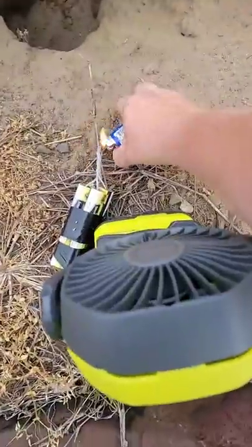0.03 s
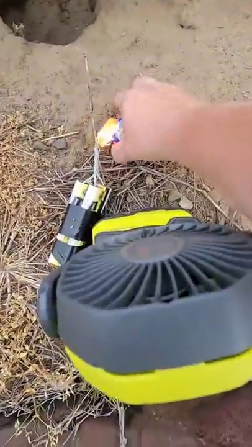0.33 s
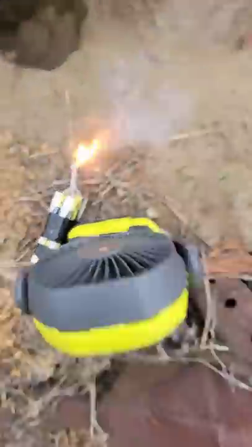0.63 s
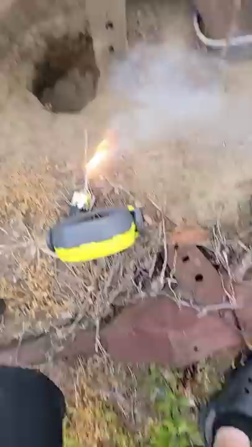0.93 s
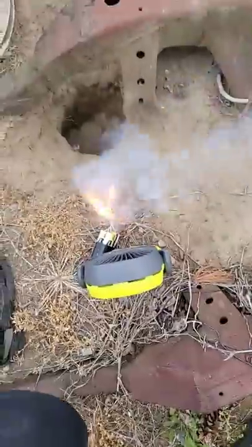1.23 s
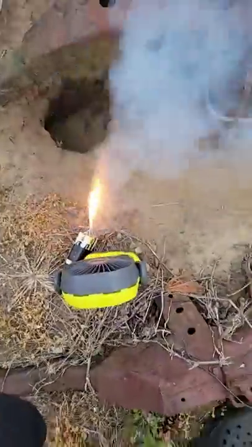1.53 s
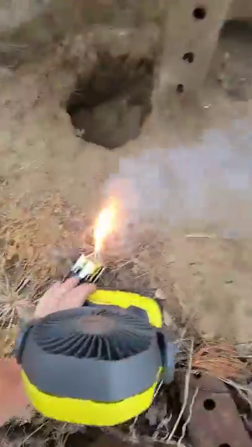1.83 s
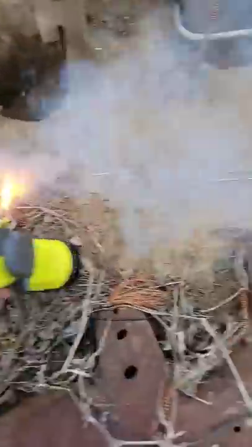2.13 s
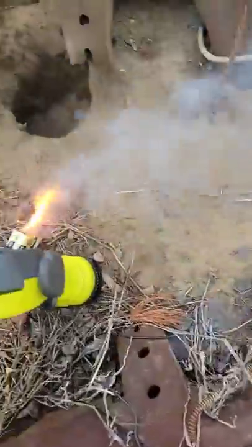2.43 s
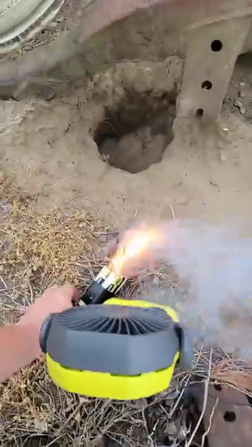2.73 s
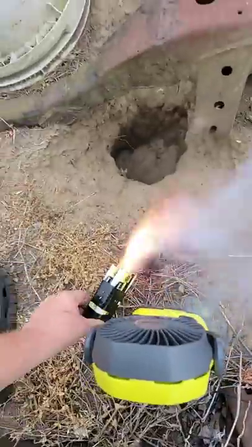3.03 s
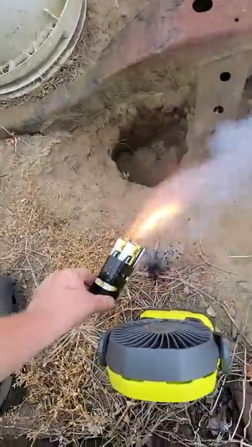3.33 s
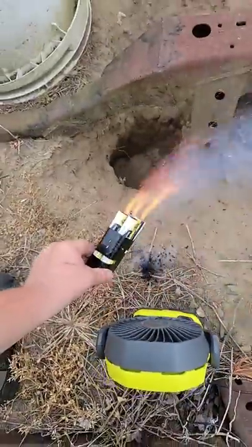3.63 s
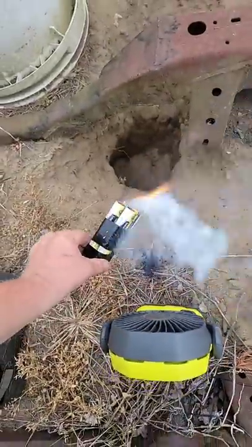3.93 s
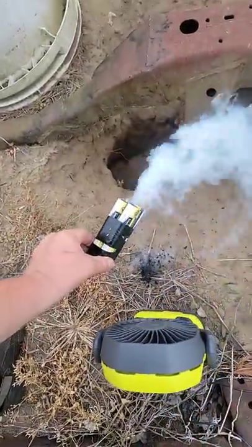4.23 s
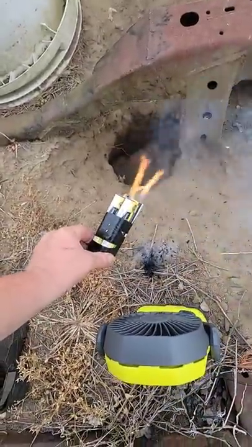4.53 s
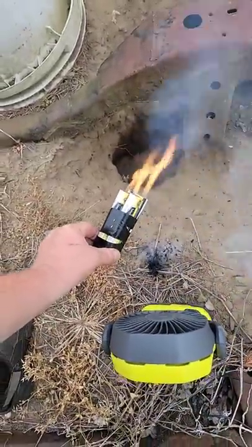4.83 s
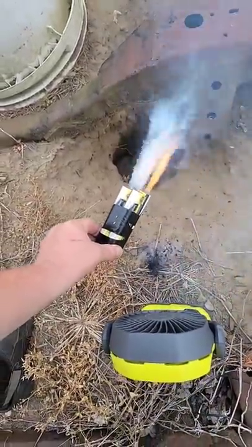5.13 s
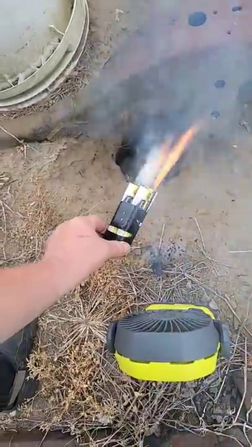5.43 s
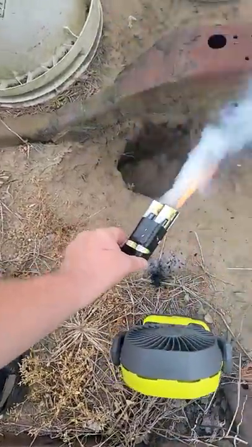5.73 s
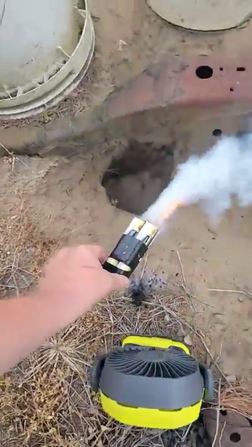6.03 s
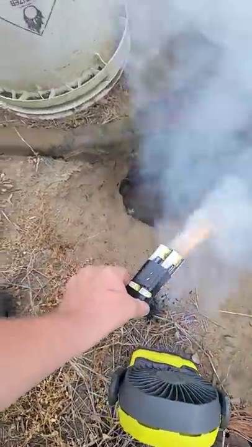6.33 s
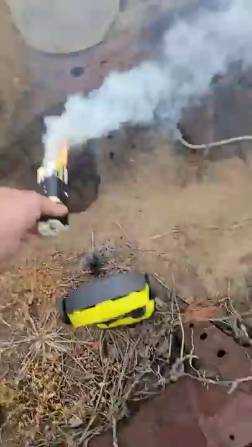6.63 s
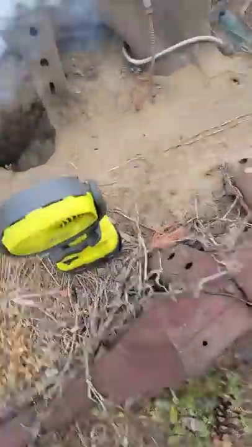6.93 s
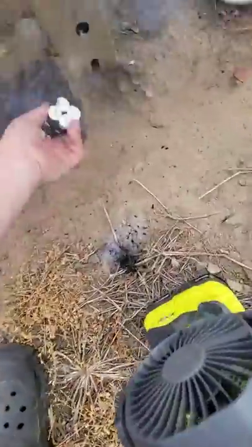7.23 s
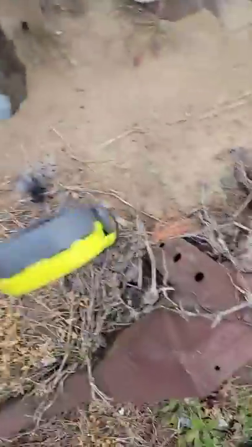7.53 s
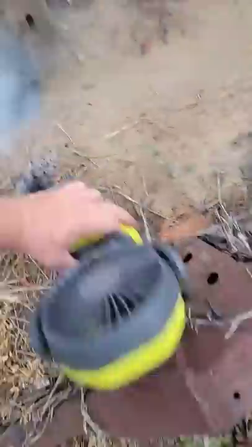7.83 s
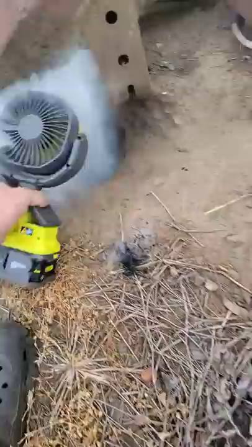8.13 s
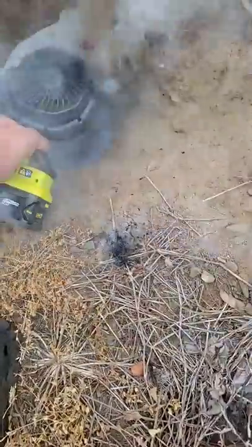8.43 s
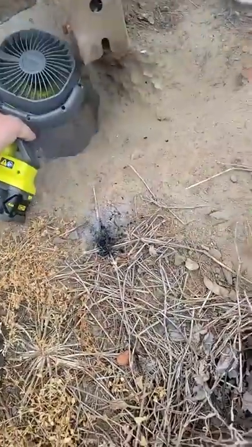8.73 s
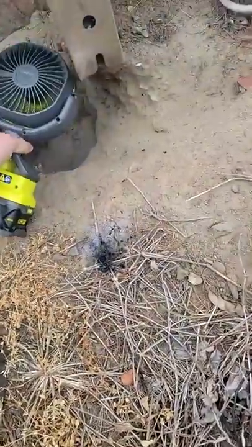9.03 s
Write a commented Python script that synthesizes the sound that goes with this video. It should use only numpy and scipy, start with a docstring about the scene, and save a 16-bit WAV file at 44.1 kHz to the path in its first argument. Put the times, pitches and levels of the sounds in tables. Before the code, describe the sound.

Outdoors, over a low rumble of air, fuses catch with a sharp crack and sizzle close to the microphone. A bundle of smoke tubes takes over with a roaring jet, falters briefly, then hisses and whistles on. Pushed into a burrow, the tubes fall to a quieter, spitting smoulder. They relight with a whump and the flame rumbles in the hole over a low, hollow note.

```python
"""A bundle of smoke tubes burns on bare ground outdoors, over a low rumble of air. The fuses catch
with a crack (0.55 s) and sizzle; the tubes take over (3.4 s) with a roaring gas jet, lose their flame
briefly (4 s), then hiss and whistle on. Pushed into a burrow (7.4 s), they smoulder and spit over its
low note, relight with a whump (8.4 s) and rumble in the hole. All burning is turbulent noise in four
registers (flutter, roar, hiss, sizzle) whose levels follow the gas flow."""
import sys
import numpy as np
from scipy import signal
from scipy.fft import rfft, irfft
from scipy.io import wavfile
from scipy.ndimage import map_coordinates

SR = 44100
rng = np.random.default_rng(int(sys.argv[2]) if len(sys.argv) > 2 else 0)


def output_pcm(signal):
    """Save a mono or channel-first signal as 16-bit PCM at the path in sys.argv[1].

    Samples are clipped to [-1, 1] before scaling.
    """
    pcm = np.clip(np.atleast_2d(signal).T, -1, 1) * 32767
    wavfile.write(sys.argv[1], SR, np.round(pcm).astype(np.int16))


N = 400869
LIGHT_S, BURY_S, RELIGHT_S = 0.49, 7.41, 8.447
SIZE, HOP = 1024, 256
T = np.arange(N) / SR
HZ = np.maximum(np.fft.rfftfreq(SIZE, 1 / SR), 1)[:, None]
FRAME_S = np.arange(-(-N // HOP) + 1) * HOP / SR

# power common to both channels: f/Hz, share for the open jet, share for burrow and air
COHERENCE = [(25, 0.87, 0.88), (60, 0.97, 0.92), (210, 0.99, 0.98), (910, 0.73, 0.73), (2480, 0.39, 0.37),
             (6600, 0.58, 0.053), (14000, 0.093, .1)]
# direction of the tubes: t/s, treble left minus right/dB, left lag/ms
BEARING = [(.5, 5.5, -0.2), (.9, 6, -0.11), (1.2, 2.5, -0.093), (1.7, -0.5, 0.048), (2.3, -2, -0.073),
           (3.15, -2, 0.018), (4.15, -3, -0.081), (5.4, -1, -.1), (6.4, -3.5, 0.011), (6.9, -1.5, -.16),
           (7.4, -1, -0.17), (7.97, -5.5, 0.1), (8.25, 0, -0.17)]


def undb(db):
    """Decibels to gain."""
    return 10 ** (np.asarray(db) / 20)


def follow(rows):
    """Columns of a time curve at every frame."""
    times_s, *columns = np.transpose(rows)
    return [np.interp(FRAME_S, times_s, c) for c in columns]


def across(rows):
    """Columns of a spectrum at every bin."""
    hz, *columns = np.transpose(rows)
    return [np.interp(np.log(HZ), np.log(hz), c) for c in columns]


def split(x):
    """Sound to short-time spectra."""
    return signal.stft(x, nperseg=SIZE, noverlap=SIZE - HOP)[2]


def join(spectra):
    """Short-time spectra to sound."""
    return signal.istft(spectra, nperseg=SIZE, noverlap=SIZE - HOP)[1][..., :N]


def delay(ms):
    """Phase turn of a delay."""
    return np.exp(-2j * np.pi * HZ * ms / 1000)


def gate(start_s, stop_s=np.inf):
    """Gate with 3.2 ms edges, per sample."""
    return np.clip(np.minimum(T - start_s, stop_s - T) / 0.0032, 0, 1)


def ramp(start_s, length_s):
    """Rise from 0 to 1, per frame."""
    return np.clip((FRAME_S - start_s) / length_s, 0, 1)


def swell(at_s, half_s):
    """Bell over time, height 1."""
    return np.exp(-((FRAME_S - at_s) / half_s) ** 2)


def peak(hz, width_hz):
    """Bell over frequency, height 1."""
    return np.exp(-((HZ - hz) / width_hz) ** 2)


def walk(rate_hz, times_s):
    """Random wander with rate_hz turns a second; spread near 1."""
    steps = rng.standard_normal(2 ** 14)
    return np.sqrt(3 / 2) * np.interp(times_s * rate_hz, np.arange(len(steps)), steps)


def patches(width_hz, rate_hz):
    """Random patches in time and frequency; spread near 1."""
    where = np.array(np.broadcast_arrays(HZ / width_hz, FRAME_S * rate_hz))
    return 3 / 2 * map_coordinates(rng.standard_normal((512, 512)), where, order=1, mode="wrap")


def band_db(colour_db, low_hz, high_hz):
    """Level in one band of white noise given this colour."""
    inside = (HZ[:, 0] >= low_hz) & (HZ[:, 0] < high_hz)
    return 10 * np.log10(np.sum(undb(colour_db[inside]) ** 2, axis=0) / len(HZ))


def resonance(rows, width_hz):
    """Moving peak or dip, in dB."""
    hz, db = follow(rows)
    return db * peak(hz, width_hz)


def passing_rings(rows):
    """Resonances that swell and fade, in dB."""
    return sum(db * swell(at_s, half_s) * peak(hz, width_hz) for at_s, half_s, hz, width_hz, db in rows)


def turbulence(coherence, rough_db, rough_hz):
    """Spectra of gusty white noise; the common part reaches one channel later."""
    gusts = undb(rough_db * walk(rough_hz, T))
    noise = split(rng.standard_normal((3, N)) * gusts / np.sqrt(np.mean(gusts ** 2)))
    lag = delay(follow(BEARING)[1] / 2)
    common = noise[0] * np.array([lag, lag.conj()])
    return np.sqrt(coherence) * common + np.sqrt(1 - coherence) * noise[1:]


def air():
    """Low outdoor rumble with a thin hiss on top; recedes as the fuses catch."""
    # air spectrum: f/Hz, relative level/dB
    colour = [(15, -37), (25, 2), (96, 5), (148, 5.5), (421, -13.5), (469, -13.5), (1020, -33),
              (2230, -29.5), (3260, -35), (3720, -32), (6380, -38), (7700, -37), (11500, -42), (15500, -18)]
    noise = turbulence(across(COHERENCE)[1], rough_db=0.5, rough_hz=16)
    rumble = join(noise * undb(across(colour)[0]))
    return rumble / rumble.std() * undb(np.interp(T, [0.5, 0.9], [-49, -54]))


def squeak(at_s=0.345, hz=3230, glide_hz_per_s=12000, half_s=0.014, peak_db=-58):
    """One faint, rough, rising squeak as the fuses are lit."""
    t = T - at_s
    pitch_hz = hz + glide_hz_per_s * np.clip(t, -0.05, 0.05) + 200 * walk(1300, T)
    return undb(peak_db) * np.exp(-(t / half_s) ** 2) * np.sin(2 * np.pi * np.cumsum(pitch_hz) / SR)


def puffs():
    """Low pushes of gas and air that die within a few cycles; some graze one side only."""
    # puffs: t/s, peak/dB, f/Hz, decay/s, left minus right/dB
    pushes = [(0.5535, -27.5, 231, 0.0041, 1), (2.714, -26, 70, .01, 12), (2.792, -26, 123.7, 0.033, 23),
              (2.813, -18.5, 62.6, 0.0041, 28), (2.817, -22.5, 189, 0.0082, 23),
              (2.98, -23.5, 110, 0.023, 28), (3.355, -31, 100, 0.017, -8), (3.694, -22, 113, 0.0058, 8),
              (3.785, -27, 90, 0.0061, 6), (4.313, -29.5, 89, 0.0053, 1), (8.447, -14, 69.6, 0.0093, 1),
              (8.452, -12.5, 185, 0.0054, 1), (8.466, -15, 190, .004, 0), (8.489, -14, 160, 0.0049, 1),
              (8.561, -14, 151, .005, 1), (8.844, -16, 204, 0.0069, 0), (8.894, -19, 220, 0.0049, -1)]
    t = np.arange(SR // 4) / SR
    out = np.zeros((2, N + len(t)))
    for at_s, db, hz, decay_s, pan_db in pushes:
        push = np.sin(2 * np.pi * hz * t) * np.exp(-t / decay_s) * (1 - np.exp(-t / 0.00065))
        pan = undb([[pan_db], [0]])
        start = int(at_s * SR)
        out[:, start:start + len(t)] += undb(db) * pan / pan.mean() * push / abs(push).max()
    return out[:, :N]


def ticks_and_pops(size=4096, rise_share=0.17):
    """Short ticks, cracks, snaps and relighting pops; longer ones open more slowly."""
    # snaps: t/s, level before envelope/dB, decay/s, f/Hz, width/octaves, left minus right/dB
    snaps = [(.144, -54, .003, 12000, 1.2, 5), (.201, -44, 0.0014, 12000, 1.2, 4),
             (.32, -47, .002, 11000, 2.3, 5), (.455, -44, 0.0023, 13000, 1.1, 10),
             (.474, -42, 0.0039, 14000, 1.9, 1), (.491, -40, 0.0076, 13000, 2.5, 5),
             (.515, -38, .002, 12000, 1.7, 3), (.526, -32, .002, 13000, 1.7, 4),
             (.5355, -32, .004, 15000, 0.68, 2), (0.5517, -12, 0.0012, 12500, 1.33, 2),
             (.5525, -30.5, 0.0046, 418, 0.91, -1), (0.835, -26, 0.0009, 1800, 0.73, -16),
             (1.585, -31, .003, 870, .6, -5), (1.621, -31, 0.0034, 850, 0.65, -4),
             (1.752, -29.5, 0.0025, 1040, 0.55, -2), (2.238, -21, 0.0018, 2530, 0.63, -8),
             (4.311, -47, 0.012, 1850, 0.8, -2), (6.634, -27, 0.023, 13300, .2, -14),
             (6.6434, -7.5, 0.00039, 12900, 0.28, -12), (7.407, -22, 0.0013, 3000, 0.62, -2),
             (7.783, -37, 0.012, 13000, 0.25, -13), (7.877, -33, .003, 10000, .6, -3),
             (7.926, -33, .003, 9000, .8, -3), (7.937, -28.5, 0.011, 13000, 0.29, -12),
             (8.186, -32, .007, 13500, 0.38, -9), (8.316, -31, .0015, 13000, .4, -2),
             (8.378, -31, 0.0017, 10900, 0.27, -6), (8.454, -23, 0.0032, 800, 0.94, 0),
             (8.552, -34, .003, 1500, .8, 0), (8.561, -24, 0.0033, 690, 1.3, 4),
             (8.568, -29.5, .002, 1600, 1.1, 0)]
    t = np.arange(size) / SR
    bins_hz = np.maximum(np.fft.rfftfreq(size, 1 / SR), 1)
    out = np.zeros((2, N + size))
    for at_s, db, decay_s, hz, octaves, pan_db in snaps:
        noise = rng.standard_normal((3, size))
        band = np.exp(-0.5 * (np.log2(bins_hz / hz) / octaves) ** 2)
        snap = irfft(rfft(noise[0] + noise[1:]) * band)
        envelope = np.exp(-t / decay_s) * (1 - np.exp(-t / (rise_share * decay_s)))
        pan = undb([[pan_db / 2], [-pan_db / 2]])
        start = int(at_s * SR)
        out[:, start:start + size] += undb(db) * pan * snap / snap.std() * envelope
    return out[:, :N]


def burrow_drone(waver_rate_hz=130, stray_hz=31.93, wobble_db=1.5):
    """Air in the burrow resonates: one low, quickly wavering note, lifted by the flame."""
    # burrow note: t/s, f/Hz, level/dB
    note = [(7.75, 182, -65), (7.92, 184, -42), (8.44, 188, -40.5), (8.47, 195, -33), (9.08, 200.3, -32)]
    times_s, hz, db = np.transpose(note)
    pitch_hz = np.interp(T, times_s, hz) + stray_hz * walk(waver_rate_hz, T)
    level_db = np.interp(T, times_s, db) + wobble_db * walk(waver_rate_hz, T)
    return np.sqrt(2) * np.sin(2 * np.pi * np.cumsum(pitch_hz) / SR) * undb(level_db) * gate(times_s[0])


def crackle(rate_hz, scatter_db):
    """Spectra of tiny sparks of uneven size."""
    sparks = rng.random(N) < rate_hz / SR
    sizes = undb(np.minimum(scatter_db * rng.exponential(size=N), 10))
    clicks = sparks * sizes * rng.uniform(-1.36, 1, (2, N))
    return split(clicks / clicks.std())


def register_levels(law, flow_db=0):
    """Flutter, roar, hiss and sizzle in dB follow the gas flow and its flares; gusts add flutter."""
    # flares: t/s, half length/s, extra flow/dB, extra roar/dB
    flares = [(0.692, 0.068, 2, 3), (3.817, 0.043, 2, 2), (4.376, 0.021, 0.5, 1), (4.654, 0.053, 2.5, 1.5),
              (5.04, 0.084, 2.5, 8.5), (5.105, 0.14, 7.5, -5.5), (5.659, 0.096, 14, -8.5),
              (5.897, 0.091, 1, 2.5), (8.553, 0.017, 5, -4), (8.8, .04, 3, -2), (8.942, 0.11, 6, -2.5)]
    # gusts tearing at the flame: t/s, half length/s, extra flutter/dB
    gusts = [(1.42, 0.15, 4), (2.587, 0.56, 5), (3.157, 0.11, 7), (3.833, 0.14, 3.5), (4.848, 0.066, 5.5),
             (5.108, 0.028, 7.5), (5.695, 0.069, 6.5), (8.494, 0.033, 3), (8.56, 0.013, -1)]
    flow_db = flow_db + sum(db * swell(at_s, half_s) for at_s, half_s, db, _ in flares)
    flutter, roar, hiss, sizzle = (db + slope * flow_db for db, slope in law)
    flutter += sum(db * swell(at_s, half_s) for at_s, half_s, db in gusts)
    roar += sum(db * swell(at_s, half_s) for at_s, half_s, _, db in flares)
    return np.array([flutter, roar, hiss, sizzle])


def burning(noise, levels_db, colour_db, flicker_db, flicker_hz, ground_gain=0.031):
    """Gas leaves the tubes: each register swells and flickers; the ground echo combs the sound."""
    # flutter, roar, hiss and sizzle bands: low f/Hz, high f/Hz
    registers = [(180, 450), (600, 3000), (4000, 9000), (11000, 15000)]
    # ground echo, later as the tubes are raised: t/s, delay/ms
    ground_echo = [(3.1, 0.64), (3.8, 1.17), (6.4, 0.93), (6.7, 2), (6.95, 2.4), (7.4, 0.53), (8, 0.59),
                   (8.2, 1)]
    log_centres = np.log(np.prod(registers, axis=1)) / 2
    shape_db = colour_db
    for band_hz, level_db, own in zip(registers, levels_db, np.eye(len(registers))):
        lift_db = level_db - band_db(colour_db, *band_hz) + flicker_db * walk(flicker_hz, FRAME_S)
        shape_db = shape_db + np.interp(np.log(HZ), log_centres, own) * lift_db
    comb = (1 + ground_gain * delay(follow(ground_echo)[0])) / np.sqrt(1 + ground_gain ** 2)
    shade = undb(follow(BEARING)[0] * HZ / (HZ + 500))  # only short waves are shaded
    pan = np.array([shade, np.ones_like(shade)]) * np.sqrt(2 / (1 + shade ** 2))
    return noise * undb(shape_db) * comb * pan


def smoulder():
    """Flameless tubes pour smoke into the burrow; their embers crackle finely."""
    # smoulder spectrum: f/Hz, relative level/dB
    colour = [(15, -50), (25, -10), (101, -8), (188, -2), (267, -7), (470, -11.5), (598, -17),
              (2170, -18.5), (2630, -15), (3170, -16.5), (6380, -19.5), (9550, -36), (12800, -35),
              (15500, -40)]
    # hollow rings: t/s, half length/s, f/Hz, width/Hz, gain/dB
    rings = [(7.7, 0.35, 2540, 400, 4.5), (8.073, 0.05, 455, 80, 14), (8.1, 0.032, 1500, 900, 9)]
    # smoke flow: t/s, flow/dB re normal
    flow = [(7.44, 2.5), (7.6, -1.5), (7.75, -2), (7.91, 4), (8.08, 1.5), (8.17, -0.5), (8.42, 0.5)]
    # per register: level at normal flow/dB, slope/(dB per dB of flow)
    law = [(-46, 0.81), (-40.5, 0.51), (-46, 0.83), (-48, 0.15)]
    noise = turbulence(across(COHERENCE)[1], rough_db=1.0, rough_hz=600)
    ember_share = 0.22 * HZ ** 2 / (HZ ** 2 + 5000 ** 2)
    noise = np.sqrt(1 - ember_share) * noise + np.sqrt(ember_share) * crackle(rate_hz=250, scatter_db=3)
    colour_db = across(colour)[0] + 1.2 * patches(width_hz=207, rate_hz=14) + passing_rings(rings)
    levels_db = register_levels(law, follow(flow)[0])
    smoke = burning(noise, levels_db, colour_db, flicker_db=1.2, flicker_hz=25)
    return join(smoke) * gate(BURY_S - 0.004, RELIGHT_S + 0.0037)


def burrow_flame():
    """The flame relights and its flutter booms in the hole."""
    # spectrum of the flame in the hole: f/Hz, relative level/dB
    colour = [(15, -41), (25, -10), (110, -1), (150, -19), (200, 1), (280, 1), (370, -7.5), (523, -14),
              (722, -16.5), (1750, -26), (2060, -23), (2770, -27), (4620, -32), (5880, -40.5),
              (7100, -39.5), (9810, -56.5), (15500, -62)]
    # per register: level at normal flow/dB, slope/(dB per dB of flow)
    law = [(-30.5, 0.38), (-36, 1.3), (-48, 0.33), (-56, 1.2)]
    noise = turbulence(across(COHERENCE)[1], rough_db=1.03, rough_hz=130)
    flame = burning(noise, register_levels(law), across(colour)[0], flicker_db=-0.4, flicker_hz=12)
    return join(flame) * gate(RELIGHT_S)


def near_echoes(strength):
    """Response of close surfaces; rough soil scatters the treble above 9 kHz instead of echoing it."""
    # reflections: delay/ms, relative gain left, relative gain right
    taps = [(0.282, 0.041, -0.0023), (0.519, -0.12, 0.12), (0.659, -0.08, 0.11), (.725, 0.16, 0.12),
            (1.14, 0.06, 0.051), (1.29, 0.21, -0.062), (1.86, .1, .04), (2.03, -0.047, 0.079),
            (2.541, -0.023, 0.0066)]
    echoes = sum(np.array([left, right])[:, None, None] * delay(ms) for ms, left, right in taps)
    response = 1 + strength * echoes / (1 + (HZ / 9000) ** 6)
    return response / np.sqrt(np.mean(abs(response) ** 2, axis=1, keepdims=True))


def hole_ring_db():
    """Tubes and hole ring together; the unsteady hand makes the pitch drift."""
    # resonances: f/Hz, width/Hz, full gain/dB
    modes = [(708, 87, 3.5), (1030, 78, 3), (1650, 91, 1.5), (1930, 76, 1.5), (2430, 87, 2), (2900, 75, 5),
             (3365, 230, 6), (4040, 120, -1), (4300, 79, 0.5), (5970, 110, 3.5), (6350, 130, 5),
             (7500, 670, 4)]
    drift = 1 + 0.015 * walk(3.6, FRAME_S)
    return sum(db * peak(hz * drift, width_hz) for hz, width_hz, db in modes)


def whistles_db(edge_s=0.025):
    """The vents whistle in turn, as narrow peaks in the jet noise."""
    # whistles: start/s, length/s, f/Hz, width/Hz, gain/dB
    vents = [(2.646, 0.35, 7300, 240, 6.5), (5.578, 0.17, 6260, 300, 7), (5.777, 0.35, 4040, 150, 8),
             (5.82, 0.32, 7400, 240, 1), (6.13, 0.38, 6080, 129, 9), (6.3, .21, 5830, 110, 6.5)]
    return sum(db * peak(hz, width_hz) * (ramp(at_s, edge_s) - ramp(at_s + length_s, edge_s))
               for at_s, length_s, hz, width_hz, db in vents)


def lowering_db():
    """The jet nears the hole: a swish and the roar at the mouth rise in pitch; the hole booms."""
    # three moving resonances, each: t/s, f/Hz, gain/dB
    swish = [(6.55, 2090, 8), (6.67, 1750, 0.5), (6.85, 1450, 2.5), (6.98, 1930, 0), (7.07, 2470, 6),
             (7.1, 3000, 2), (7.125, 3330, 13), (7.165, 3750, 6), (7.22, 4200, 0), (7.4, 5830, -6)]
    mouth = [(7.05, 850, 1.5), (7.1, 1050, 5), (7.17, 1490, 6), (7.21, 1100, -9), (7.25, 870, 12),
             (7.31, 1190, 11), (7.37, 1470, 1), (7.4, 1780, -2)]
    boom = [(6.85, 230, -4), (7.1, 245, 11), (7.2, 250, 9), (7.27, 251, 7), (7.4, 267, 16)]
    peaks_db = resonance(swish, width_hz=610) + resonance(mouth, width_hz=230)
    peaks_db += resonance(boom, width_hz=210)
    return ramp(6.49, 0.17) * peaks_db


def hiss_dip_db():
    """A moving dip darkens the hiss around 5-8 kHz, then turns into a bright peak."""
    # path of the dip: t/s, f/Hz, gain/dB
    dip = [(.5, 5300, 6), (1.1, 5800, -4.5), (2.05, 5570, -13), (2.3, 6130, -10.5), (2.55, 8200, -6),
           (2.9, 9600, 12)]
    return resonance(dip, width_hz=2030)


def sizzle_and_body_db(handover):
    """The sizzle's brightest pitch sinks, the fuses sputter and the young flame gains body."""
    # brightest pitch of the sizzle: t/s, f/Hz, gain/dB
    sizzle = [(.55, 15100, 2.5), (1.6, 13800, 4.5), (2.5, 13100, 3), (3.3, 13450, 16), (3.85, 13100, 6),
              (4.3, 12800, 15.5), (6.2, 13600, 1.5), (6.8, 13600, -2.5), (7.4, 13740, 3)]
    # body of the young flame: t/s, half length/s, f/Hz, width/Hz, gain/dB
    rings = [(1.33, 0.28, 1000, 780, 11), (1.45, .22, 4000, 320, 3), (2.25, 0.39, 1100, 570, 4.5),
             (0.88, 0.14, 4000, 1500, 3)]
    sputter_db = 2 * patches(width_hz=1174, rate_hz=32) * peak(13700, width_hz=4500)
    return resonance(sizzle, width_hz=2140) + passing_rings(rings) + (1 - handover) * sputter_db


def open_levels(handover, flame_out):
    """Register levels in dB as the fuses catch, the tubes take over and the flame briefly fails."""
    # gas flow: t/s, flow/dB re normal
    flow = [(.6, -12), (1.22, -7), (1.45, -5.5), (2.15, -3.5), (2.35, -7.5), (2.58, -3), (2.79, 2.5),
            (3.2, 0.5), (3.47, 6.5), (3.7, 7), (3.82, 6.5), (4.3, -6.5), (4.9, 0), (5.45, -4), (5.78, -5.5),
            (5.88, 2), (6.03, 1), (6.17, 4.5), (6.5, 2.5), (6.8, 3.5), (7.03, 0), (7.13, 3), (7.36, 3),
            (7.4, 2)]
    # per register: level at normal flow/dB, slope/(dB per dB of flow)
    fuse_law = [(-46.5, 0.18), (-40, 0.5), (-30.5, 1.2), (-35.5, -0.3)]
    tube_law = [(-43, 0.27), (-30, 0.59), (-31.5, 0.87), (-42.5, 1.35)]
    smoke_law = [(-48.5, 0.12), (-46, 0.082), (-47.5, 0.047), (-54.5, 0.066)]
    # fuse sizzle: t/s, gain/dB
    sizzle = [(.6, -0.5), (1.0, 1), (1.25, 2.5), (1.65, 7), (1.88, 5), (2.55, 6), (2.85, -1), (3.1, 5),
              (3.35, 12.5)]
    # fuse spurts: t/s, half length/s, extra sizzle/dB
    spurts = [(0.58, 0.016, 2), (.69, .05, 2.5), (.89, .03, 3), (1.304, 0.044, 3.5), (1.42, .04, 1.5),
              (1.674, 0.043, -3), (1.87, .018, 7), (1.93, .025, 2), (1.99, 0.037, 3), (2.08, 0.022, 1),
              (2.155, 0.039, 3.5), (2.31, 0.033, -4), (2.37, .025, 0.5), (2.54, .03, -3), (2.633, .04, 1)]
    flow_db = follow(flow)[0] + 0.97 * walk(7.9, FRAME_S)
    fuse_db, tube_db, smoke_db = (register_levels(law, flow_db) for law in (fuse_law, tube_law, smoke_law))
    fuse_db[-1] += follow(sizzle)[0] + sum(db * swell(at_s, half_s) for at_s, half_s, db in spurts)
    tube_db[0] += 14 * ramp(6.97, 0.34)  # flutter grows on entering the hole
    kindling_db = -12 * (1 - ramp(0.532, 0.045))  # faint until the fuses catch
    alight_db = (1 - handover) * fuse_db + handover * tube_db + kindling_db
    return (1 - flame_out) * alight_db + flame_out * smoke_db


def open_jet():
    """Fuses, then tubes, burn in the open: a sparking gas jet coloured by eddies, vents and the hole."""
    # fuse and tube spectra: f/Hz, relative level/dB
    fuse_colour = [(15, -30), (25, -9), (122, 2), (204, -4), (300, -1), (570, -11), (900, -7), (1500, -8),
                   (2700, -6.5), (4200, -5.5), (5200, -5.5), (7400, -4), (9300, -14), (11500, -11.5),
                   (13500, -8), (15500, -10)]
    tube_colour = [(15, -37), (25, -13), (140, -2.5), (267, -3.5), (421, -7.5), (722, -6.5), (1270, -8.5),
                   (1660, -4), (2170, -2.5), (3260, -3), (4750, 1), (7500, -3.5), (10100, -18.5),
                   (12200, 3), (15500, 0)]
    # nearness to the hole: t/s, share of ring and close echoes
    nearness = [(2.9, 0.15), (3.5, 0.78), (6.48, 1), (6.62, 0.69)]
    over_hole, = follow(nearness)
    handover = ramp(3.357, 0.45)  # 0 fuses, 1 tubes
    flame_out = ramp(3.78, 0.22) ** 3.6 * (1 - ramp(4.307, 0.008))
    fuse_share = 0.98 * (1 - handover) + 0.29 * handover
    flame_db = fuse_share * across(fuse_colour)[0] + (1 - fuse_share) * across(tube_colour)[0]
    smoke_db = 5 * peak(2760, width_hz=1600) + 5 * peak(10200, width_hz=1300)  # breezy hiss, airy top
    hole_db = over_hole * hole_ring_db() + lowering_db()
    vent_db = sizzle_and_body_db(handover) + whistles_db() + flame_out * smoke_db
    eddy_db = 2.85 * patches(width_hz=170, rate_hz=30) * HZ / (HZ + 1500)
    colour_db = flame_db + hole_db + vent_db + eddy_db + hiss_dip_db()
    gas = turbulence(across(COHERENCE)[0], rough_db=0.23, rough_hz=440)
    sparks = crackle(rate_hz=650, scatter_db=4.5)
    spark_share = 0.015 + 0.075 * (1 - handover)
    noise = np.sqrt(1 - spark_share) * gas + np.sqrt(spark_share) * sparks
    jet = burning(noise, open_levels(handover, flame_out), colour_db, flicker_db=1.0, flicker_hz=50)
    echoes = near_echoes(over_hole * (1 - flame_out))  # loose smoke is too diffuse for sharp echoes
    return join(jet * echoes) * gate(LIGHT_S, BURY_S)


def scene():
    """All sources in stereo."""
    tubes = open_jet() + smoulder() + burrow_flame()
    return tubes + burrow_drone() + ticks_and_pops() + puffs() + squeak() + air()


def record(dry):
    """Steep low-pass at 15.55 kHz."""
    return signal.sosfilt(signal.ellip(12, 0.1, 80, 15550, fs=SR, output="sos"), dry)


dry = scene()
out = record(dry)
output_pcm(out)
```